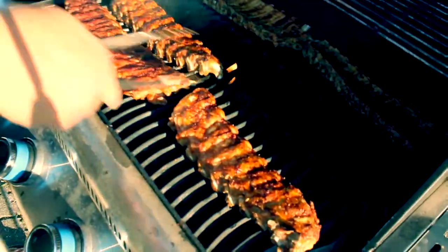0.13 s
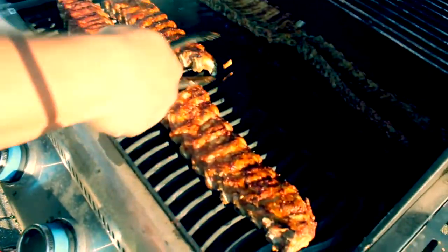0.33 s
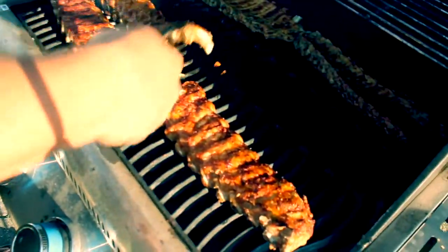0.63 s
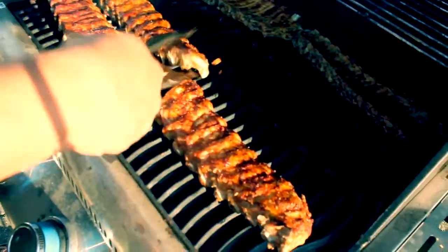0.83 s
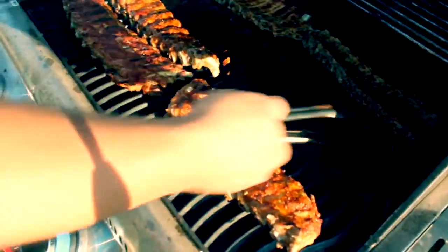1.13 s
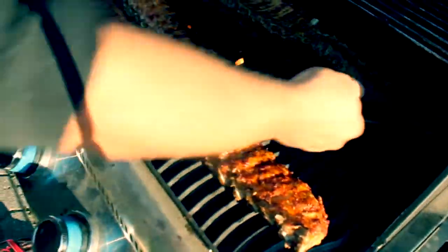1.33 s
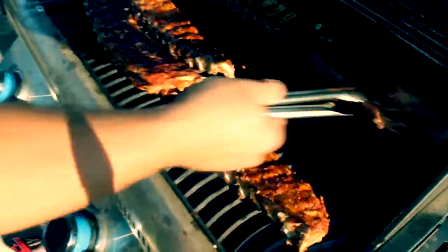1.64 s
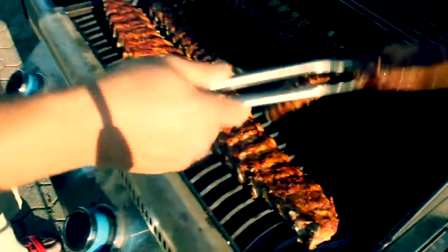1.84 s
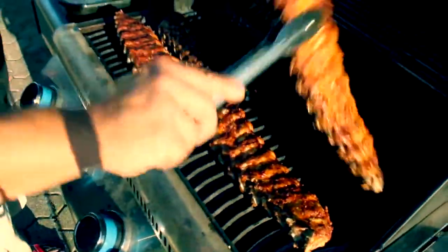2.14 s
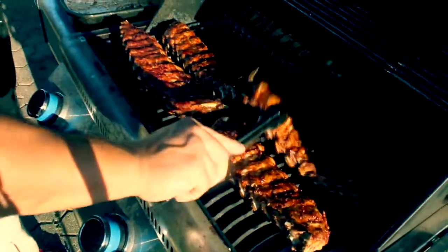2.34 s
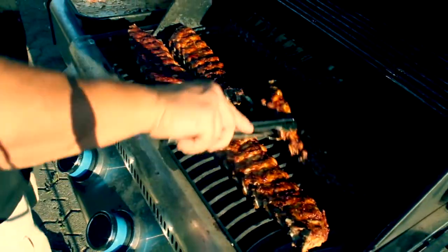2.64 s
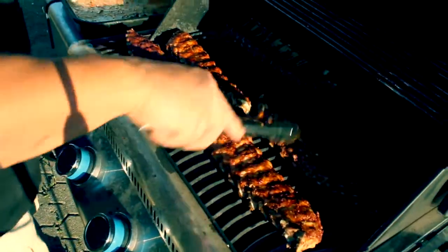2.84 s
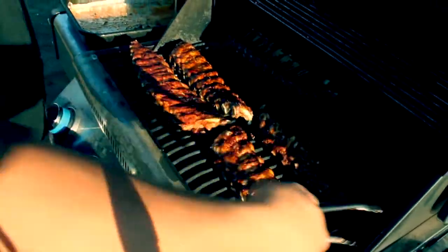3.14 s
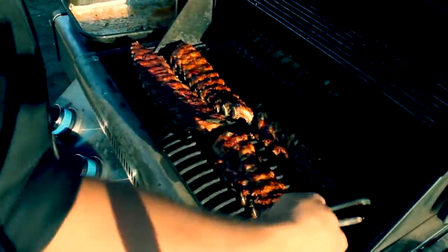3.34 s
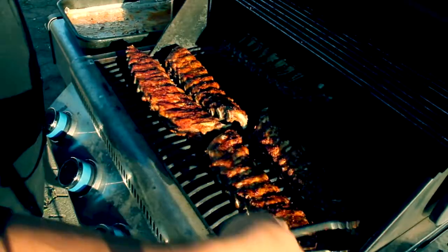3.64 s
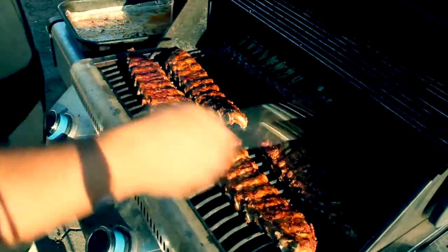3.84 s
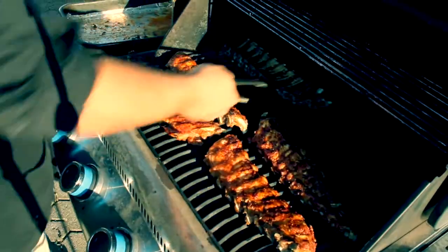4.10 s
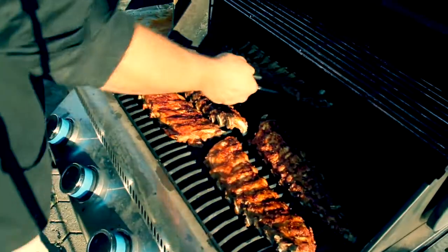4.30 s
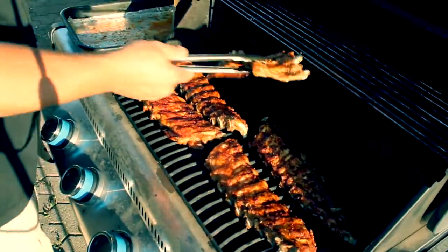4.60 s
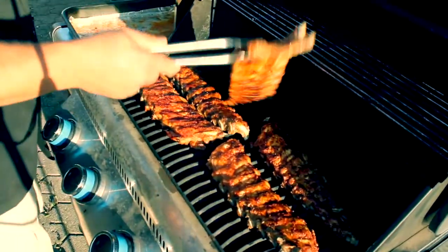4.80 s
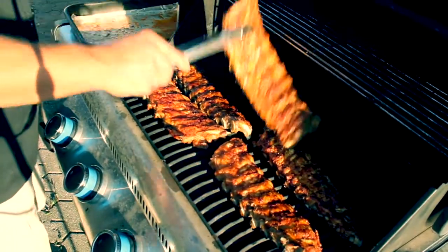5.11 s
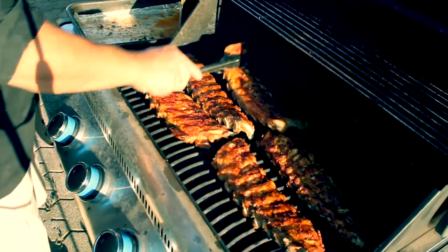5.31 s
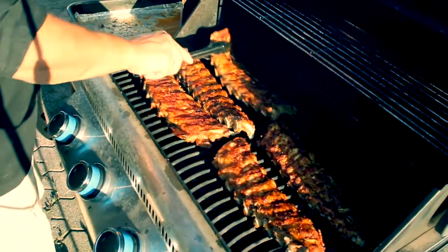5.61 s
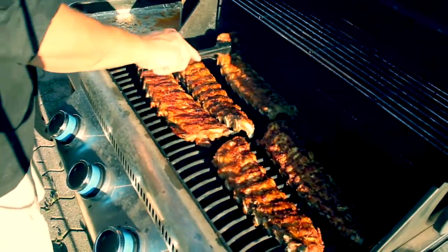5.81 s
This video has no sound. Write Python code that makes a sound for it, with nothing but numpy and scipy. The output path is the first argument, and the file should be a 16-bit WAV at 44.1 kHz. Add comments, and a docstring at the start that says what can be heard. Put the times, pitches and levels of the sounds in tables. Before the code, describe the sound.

Steel tongs clack, scrape and jingle on grill grates as racks of ribs are turned, over faint sizzle and fat spits outdoors.

```python
"""Ribs turned on an outdoor grill

One small microphone, close by, hears steel tongs turn racks of ribs on the grate.
Each touch is a blow and a dying run of tiny impacts that rings the modes of the grate; tongs jingle higher.
Knocks thump through the frame as short low swings, and spitting fat gives short puffs of bright noise.
Sizzle is filtered grainy noise with small pings, fading while the meat is lifted.
Behind it lies a low outdoor rumble of wavering filtered noise."""
import sys
import numpy as np
from scipy import signal
from scipy.fft import rfft, irfft
from scipy.io import wavfile
from scipy.ndimage import uniform_filter1d

SR = 44100
rng = np.random.default_rng(int(sys.argv[2]) if len(sys.argv) > 2 else 0)


def undo_db(level):
    """Turn decibels back into plain size, where 20 dB means ten times bigger."""
    steps = np.asarray(level, float) / 20
    return 10 ** steps


def put_to_file(sound):
    """Save the sound as 16-bit audio at rate SR, in the file named by the first command-line argument."""
    columns = np.atleast_2d(sound).T  # one column per channel
    safe = np.clip(columns, -1, 1)
    whole_steps = np.round(safe * 32767)
    wavfile.write(sys.argv[1], SR, whole_steps.astype(np.int16))


N = 262699  # length [samples]


def curve(rows, count=1):
    """One column of a table, read at every sample along the times in its first column."""
    return np.interp(np.arange(N) / SR, np.array(rows)[:, 0], np.array(rows)[:, count])


def coloured(x, colour, lo_hz, hi_hz):
    """Filter by points of (frequency [Hz], level [dB]); rms 1 between the two frequencies."""
    hz, db = np.transpose(colour)
    bins = np.arange(len(x) // 2 + 1) * SR / len(x)
    gain_db = np.interp(np.log(bins + 1), np.log(hz), db, left=-90, right=-90)
    spectrum = rfft(x) * undo_db(gain_db)
    inside = irfft(spectrum * ((bins > lo_hz) & (bins < hi_hz)), len(x))
    return irfft(spectrum, len(x)) / np.std(inside)


def walk(rate):
    """Random levels held 1 / rate seconds and slewed twice; spread 1."""
    k = int(SR / rate)
    steps = np.repeat(rng.standard_normal(N // k + 1), k)
    steps = uniform_filter1d(uniform_filter1d(steps, k), k)[:N]
    return steps / np.std(steps)


def add(out, x, s):
    """Mix a sound in at s seconds."""
    i = int(s * SR)
    out[i:i + len(x)] += x[:N - i]


def envelope(t, rise_s, t60):
    """Quick rise, exponential fall by 60 dB in t60 seconds."""
    return (1 - np.exp(-t / max(rise_s, 1 / SR))) * 1000. ** (-t / max(t60, 100 / SR))


def touches(events, modes, edge_hz, ramp_oct, reach, focus_db, blow_db, soft_hz, rise_s):
    """Each touch is a first blow and a dying run of tiny impacts while the point of contact slides along."""
    bars, spots, slide_s = 2, 3, .045  # near-equal bars, spots of contact, time from spot to spot [s]
    grain_db, scatter_db = 3.0, 3.5  # unevenness of the impacts and of the mode strengths
    # near-equal bars: every mode comes as a close pair
    hz, t60, db = np.repeat(modes, bars, axis=0).T[:, :, None]
    t, long = np.arange(SR // 16) / SR, np.arange(SR // 2) / SR
    # distance past the edge, in ramps of ramp_oct octaves (negative: downwards)
    beyond = np.clip(np.log2(hz / edge_hz) / ramp_oct, 0, reach)
    near, far = beyond == 0, beyond > 0
    # a mode needs a cycle or so to get moving, so the low ones come late
    shape = (1 - np.exp(-t * hz / 0.48)) ** 2 * 1000. ** (-t / t60)
    # share of the push that each spot receives, passing round the spots in turn
    share = np.cos(np.pi * (long / slide_s - np.arange(spots)[:, None]) / spots) ** 4
    out = np.zeros(N)
    for s, level_db, far_db, favoured_hz, chatter_s in events:
        # modes near the favoured pitch move most; those past the edge follow the hardness of the contact
        away_db = np.minimum(focus_db * np.abs(np.log2(hz / favoured_hz)), 9.0) * near
        detuned_hz = hz * (1 + 0.023 * rng.standard_normal(hz.shape))
        rings = undo_db(db - away_db) * shape * np.sin(2 * np.pi * detuned_hz * t)
        balance = np.linalg.norm(rings * near) / np.linalg.norm(rings * far)
        rings = rings * np.where(far, balance * undo_db(far_db * beyond), 1)
        # every spot drives the modes with its own strengths and signs
        strength, sign = rng.standard_normal((2, spots, len(hz)))
        bodies = (undo_db(scatter_db * strength) * np.sign(sign)) @ rings
        impacts = rng.standard_normal(len(long)) * undo_db(grain_db * rng.exponential(size=len(long)))
        # later impacts are softer and so duller than the first blow
        soft = signal.lfilter(*signal.butter(1, soft_hz, fs=SR), impacts)
        blow = undo_db(blow_db) * np.exp(-long / rise_s) * impacts
        force = envelope(long, rise_s, chatter_s) * (soft + blow)
        ring = signal.fftconvolve(force * share, bodies, axes=1).sum(axis=0)
        # peak of a sine as strong as the loudest 10 ms
        top = np.sqrt(2 * uniform_filter1d(ring ** 2, SR // 100).max())
        add(out, undo_db(level_db + max(far_db, 0)) * ring / top, max(s - rise_s / 2, 0))
    return out


# meat or tongs meeting the grate: (time [s], level before any boost from bright upper modes [dB],
# upper modes [dB per ramp past the edge], favoured pitch [Hz], chatter t60 [s])
GRATE_CONTACTS = [(0.032, -13.5, 0.5, 715, 0.081), (0.058, -24, -4, 430, 0.26), (0.428, -20, -5, 940, 0.27),
                  (0.48, -21.5, -37, 830, 0.15), (0.528, -31, -22, 630, 0.06),
                  (0.678, -39, -36, 1050, 0.15), (0.752, -34, -52, 1290, 0.05),
                  (0.764, -24, -57, 1060, 0.068), (0.778, -28, -69, 760, 0.2), (1.202, -31, 0, 1880, 0.51),
                  (1.225, -26, 1.5, 460, 0.34), (1.312, -21.5, -2, 1450, 0.22),
                  (1.339, -23.5, -7, 820, 0.21), (2.27, -20.5, 1.5, 1470, 0.11),
                  (2.286, -17.5, -4, 1580, 0.16), (2.318, -20.5, -5.5, 1160, 0.33),
                  (2.354, -21.5, -0.5, 1480, 0.26), (2.398, -20, -5.5, 1240, 0.15),
                  (2.434, -29, -13, 1080, 0.45), (2.485, -26.5, -31, 1150, 0.12),
                  (2.515, -27.5, -61, 950, 0.22), (2.715, -40, -30, 1070, 0.32),
                  (2.779, -34.5, -0.5, 740, 0.17), (2.805, -30.5, -16, 570, 0.14),
                  (2.885, -27.5, -3, 940, 0.21), (3.189, -34.5, 10.5, 1640, 0.28),
                  (3.217, -24.5, -2, 1210, 0.21), (3.257, -26.5, -27, 1130, 0.17),
                  (3.376, -36.5, -18, 1350, 0.24), (3.609, -23.5, -5, 1380, 0.23),
                  (3.62, -19.5, -2, 1200, 0.23), (3.683, -24, -39, 1290, 0.089),
                  (3.7, -24.5, -38, 554, 0.055), (3.735, -29.5, -46, 740, 0.24),
                  (4.113, -31.5, -14, 666, 0.36), (4.135, -25.5, 2.5, 1400, 0.33),
                  (4.2, -26, -19, 670, 0.28), (4.269, -31, -36, 624, 0.058),
                  (5.172, -38.5, -35, 1190, 0.084), (5.211, -11, -3, 1440, 0.1),
                  (5.219, -12.5, -0.5, 1290, 0.075), (5.245, -22, -10, 1390, 0.46),
                  (5.299, -25, -11, 1510, 0.28), (5.392, -36, -22, 1310, 0.049),
                  (5.473, -25.5, -20, 1430, 0.17), (5.494, -21.5, -18, 1020, 0.52),
                  (5.534, -20, -7.5, 1176, 0.47), (5.593, -25.5, -14, 1200, 0.3),
                  (5.649, -31.5, -22, 1110, 0.26), (5.716, -24.5, -39, 1230, 0.21)]
# ringing of the grate bars: (centre frequency [Hz], t60 [s], level [dB])
GRATE_RINGING = [(266, 0.039, -27), (336, 0.058, -4), (430, 0.054, -6), (486, 0.043, -1.5),
                 (563, 0.064, -2.5), (637.6, 0.053, -1.5), (740, 0.041, 0.5), (814, 0.057, -5.5),
                 (907, 0.046, -5.5), (1017, 0.068, -3.5), (1071, 0.023, -6.5), (1163, 0.032, 3),
                 (1200, 0.033, -4), (1326, 0.03, -1.5), (1400, 0.042, 0.5), (1588, 0.036, 0.5),
                 (1710, 0.031, -9), (1702, 0.021, 5.5), (1917, 0.028, -7.5), (2070, 0.044, -5.5),
                 (2286, 0.038, -12), (2365, 0.032, 2.5), (2478, 0.012, 8.5), (2690, 0.047, -11),
                 (2844, 0.016, -4.5), (3170, 0.045, -3), (3490, 0.032, -25), (3300, 0.033, -19),
                 (3806, 0.033, -10), (4020, 0.0094, -35), (4040, 0.019, -3.5)]


def grate():
    """Touched grate bars ring; the modes above the edge brighten or dull with each contact."""
    return touches(GRATE_CONTACTS, GRATE_RINGING, edge_hz=1424, ramp_oct=0.78, reach=2.7,
                   focus_db=9.5, blow_db=-2, soft_hz=2200, rise_s=0.00393)


# tongs clicking or sliding on steel: (time [s], level before any boost from strong lower modes [dB],
# lower modes [dB per ramp below the edge], chatter t60 [s])
TONG_CONTACTS = [(0.0299, -30, 8, 0.058), (0.1274, -25, -36, 0.54), (0.166, -26.5, -51, 0.23),
                 (0.1903, -30, -32, 0.15), (0.217, -27, -26, 0.17), (0.2435, -28, -29, 0.26),
                 (0.272, -25, -36, 0.17), (0.3101, -26.5, -27, 0.39), (0.3573, -28.5, -33, 0.12),
                 (0.4212, -23, -0.5, 0.16), (0.4434, -24.5, -0.5, 0.25), (0.4744, -25, -5, 0.16),
                 (0.6774, -34, -38, 0.25), (1.2012, -13, -10, 0.085), (1.2184, -20, -8, 0.23),
                 (1.3078, -25, -6, 0.33), (1.325, -26, -19, 0.13), (1.3528, -17, -14.5, 0.05),
                 (2.407, -40, -25, 0.32), (2.4598, -41, -13, 0.44), (2.807, -41, 3, 0.14),
                 (3.1848, -20, 1.5, 0.3), (3.2129, -23.5, 0.5, 0.14), (3.6674, -19.5, -8.5, 0.089),
                 (3.704, -31.5, 2, 0.064), (3.7336, -33.5, 2, 0.074), (4.1089, -22.5, -9, 0.12),
                 (4.119, -18, -4, 0.12), (4.1369, -20, 4, 0.1), (4.1544, -26.5, 3.5, 0.059),
                 (4.204, -31, -12, 0.042), (4.2633, -36, 1, 0.061), (5.2083, -20, -5, 0.03)]
# ringing of the tongs: (centre frequency [Hz], t60 [s], level [dB])
TONG_RINGING = [(2580, 0.074, -8.5), (2750, 0.032, -13), (2997, 0.016, 3.5), (3610, 0.051, -0.5),
                (3760, 0.012, 2), (3984, 0.048, -2.5), (4145, 0.014, -1), (4500, 0.026, -5),
                (5260, 0.013, -8), (5500, 0.018, -24), (5870, 0.045, -5.5), (6057, 0.034, 0.5),
                (6190, 0.011, 3), (6580, 0.013, -11), (6740, 0.014, 2), (6990, 0.0089, 4.5),
                (7230, 0.0077, -7.5), (7510, 0.017, 3), (7610, 0.024, -2), (7880, 0.029, -2),
                (8530, 0.063, -5), (8370, 0.046, -12.5), (9240, 0.028, -9), (9800, 0.02, -20),
                (10600, 0.0094, -15), (10700, 0.013, -29), (11500, .015, -28), (12000, .015, -31),
                (13200, .015, -30)]


def tongs():
    """Small steel tongs ring higher than the grate; here the modes below the edge vary with each contact."""
    favoured_hz = 7060
    clicks = [(s, level_db, lower_db, favoured_hz, t60) for s, level_db, lower_db, t60 in TONG_CONTACTS]
    return touches(clicks, TONG_RINGING, edge_hz=5500, ramp_oct=-.05, reach=0.65,
                   focus_db=12.5, blow_db=2.0, soft_hz=9200, rise_s=0.0017)


def firebox(x, t60, wet_db):
    """The open steel box returns a short, diffuse, dull tail."""
    t = np.arange(SR // 4) / SR
    dull = signal.lfilter([.3], [1, -.7], rng.standard_normal(len(t)))
    tail = dull * 1000. ** (-t / t60)
    return x + undo_db(wet_db) * signal.fftconvolve(x, tail / np.linalg.norm(tail))[:N]


# knocks through the frame: (time [s], peak level [dB], pitch [Hz])
FRAME_KNOCKS = [(4.046, -33.5, 159), (4.127, -31.5, 153), (4.2201, -16, 190), (4.242, -20.5, 172),
                (4.326, -34.5, 148), (4.465, -19.5, 154), (5.24, -26.5, 154), (5.385, -32, 152),
                (5.599, -18, 180)]


def thumps():
    """A knock bends the frame for a cycle or two: a low swing that rises faster than it falls."""
    rise_s = 0.0022
    out, t = np.zeros(N), np.arange(SR // 10) / SR
    late = t - 2 * rise_s
    width_s = np.where(late < 0, rise_s, 1.95 * rise_s)
    swing = np.exp(-.5 * (late / width_s) ** 2)
    for s, peak_db, hz in FRAME_KNOCKS:
        add(out, undo_db(peak_db) * swing * np.cos(2 * np.pi * hz * late), s - rise_s)
    return out


# fat spitting on the hot bars: (time [s], level [dB], t60 [s], tilt about 7 kHz [dB per octave])
FAT_SPITS = [(0.069, -16.5, 0.022, 14), (0.2713, -30, 0.027, 12), (0.3095, -26, 0.024, 10),
             (0.345, -16, 0.024, 9), (0.4436, -20.5, 0.031, 14), (1.5085, -29, 0.065, 8),
             (2.139, -33, 0.16, -1), (2.3874, -40.5, 0.23, 16), (2.5097, -25, 0.06, 5.5),
             (2.7043, -33, 0.052, 13), (2.7718, -31, 0.24, 2), (2.7934, -28.5, 0.11, -7.5),
             (4.2584, -26, 0.032, 1), (4.5102, -21.5, 0.025, -1), (4.544, -29, 0.02, -8),
             (4.7423, -35.5, 0.23, 0), (5.207, -26, 0.04, 14), (5.691, -29.5, 0.046, 11)]
# spectrum of a spit before its tilt: (frequency [Hz], relative level [dB])
SPIT_SPECTRUM = [(1500, -16), (3000, 0), (5100, 1.5), (7300, 4.5), (9000, -3.5), (11000, -14.5),
                 (13500, -26), (15500, -47)]


def spits():
    """A drop of fat flashes to steam: a short puff of coloured noise."""
    out, t = np.zeros(N), np.arange(SR // 4) / SR
    for s, level_db, t60, tilt_db in FAT_SPITS:
        colour = [(hz, db + tilt_db * np.log2(hz / 7000)) for hz, db in SPIT_SPECTRUM]
        steam = coloured(rng.standard_normal(len(t)), colour, 3000, 14000)
        puff = envelope(t, 0.0019, t60) * steam
        add(out, undo_db(level_db) * puff / np.sqrt(2), s)
    return out


# sizzle under the meat: (time [s], level of the hiss [dB], level of the finest spray [dB])
SIZZLE_LEVELS = [(0.0, -38, -58), (0.21, -43.5, -51), (0.48, -44.5, -60), (0.8, -43, -58.5),
                 (1.36, -49, -66), (1.6, -47.5, -67), (1.94, -54, -72), (2.17, -59.5, -88),
                 (2.39, -55, -61), (2.54, -46, -60.5), (2.8, -50.5, -70), (3.33, -49, -57.5),
                 (3.58, -48.5, -62.5), (3.95, -46.5, -60), (4.4, -47.5, -64.5), (5.15, -50, -66.5),
                 (5.5, -45.5, -59), (5.96, -48.5, -64.5)]
# spectrum of the hiss: (frequency [Hz], relative level [dB])
HISS_SPECTRUM = [(260, -23), (450, -29), (800, -9.5), (1400, -7), (2100, -12.5), (2800, -7.5), (4000, -6.5),
                 (5100, -12), (6000, -5.5), (7300, -2.5), (8500, -6), (9700, -20.5), (11000, -55)]
# spectrum of the finest spray: (frequency [Hz], relative level [dB])
SPRAY_SPECTRUM = [(8500, -3), (9700, 2.5), (11000, -4.5), (13000, -11.5), (14500, -20), (15500, -36)]


def sizzle():
    """Countless fat bubbles burst; a few pop louder, and hiss and fine spray flutter apart."""
    pops_db = 3.2 * np.minimum(rng.exponential(size=(2, N)), 6.0)
    bursts = rng.standard_normal((2, N)) * undo_db(pops_db)
    hiss = undo_db(1.1 * walk(20)) * coloured(bursts[0], HISS_SPECTRUM, 5500, 9000)
    spray = undo_db(2.2 * walk(30)) * coloured(bursts[1], SPRAY_SPECTRUM, 9800, 14000)
    hiss = hiss + undo_db(-2.0) * bubbles(count=260, low_hz=3000, octaves=1.65)
    spray = spray + undo_db(-4.0) * bubbles(count=260, low_hz=9300, octaves=0.55)
    return undo_db(curve(SIZZLE_LEVELS)) * hiss + undo_db(curve(SIZZLE_LEVELS, count=2)) * spray


def bubbles(count, low_hz, octaves):
    """Single larger bubbles ring briefly as they burst, at random times, pitches and levels."""
    out, t = np.zeros(N), np.arange(SR // 25) / SR
    for when, pitch, size in rng.random((count, 3)):
        hz = low_hz * 2 ** (octaves * pitch)
        ping = np.sin(2 * np.pi * hz * t) * envelope(t, 0.0023, 0.031)
        # most are faint, a few much louder
        add(out, undo_db(-2.8 * np.log(size + 1 / count)) * ping, when * N / SR)
    return out


# outdoor rumble behind the grill: (time [s], level [dB])
RUMBLE_LEVELS = [(0.0, -46.5), (0.3, -49.5), (1.5, -53), (2.32, -60), (2.45, -46), (2.7, -52.5), (3.0, -54),
                 (3.32, -46.5), (4.05, -50.5), (4.21, -48.5), (4.5, -51), (5.23, -54.5), (5.43, -46),
                 (5.96, -48)]
# spectrum of the rumble: (frequency [Hz], relative level [dB])
RUMBLE_SPECTRUM = [(15, -58), (30, -35), (70, -26), (100, -17), (160, -9), (230, -6), (330, -11),
                   (410, -15), (800, -17), (1200, -38)]


def rumble():
    """Burner roar and light wind: low filtered noise, wavering."""
    level_db = curve(RUMBLE_LEVELS) + 2.2 * walk(9)
    return undo_db(level_db) * coloured(rng.standard_normal(N), RUMBLE_SPECTRUM, 100, 400)


def scene():
    """Grate and tongs inside the box, with knocks, sizzle, spits and rumble."""
    # thin bars radiate little bass
    bass_cut = signal.butter(3, 200, "high", fs=SR, output="sos")
    steel = signal.sosfilt(bass_cut, grate() + tongs())
    return (firebox(steel, t60=0.16, wet_db=-12) + thumps() + sizzle() + spits() + rumble())[None]


def top_cut(x):
    """Nothing passes above the cut-off."""
    return signal.sosfilt(signal.butter(12, 15510, fs=SR, output="sos"), x)


def record(dry):
    """The small microphone rounds the loudest peaks."""
    mix = np.tanh(1.091 * dry) / 1.114
    return top_cut(mix)


dry = scene()
out = record(dry)
put_to_file(out)
```